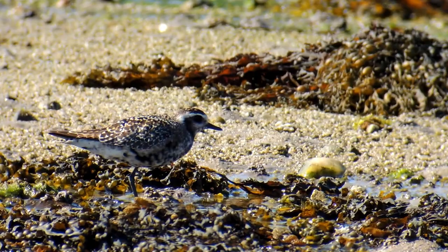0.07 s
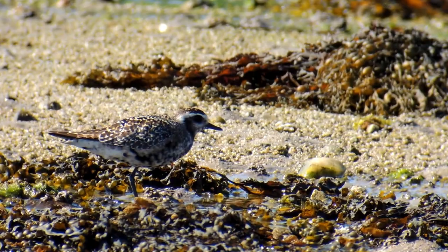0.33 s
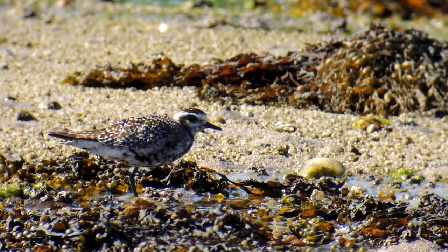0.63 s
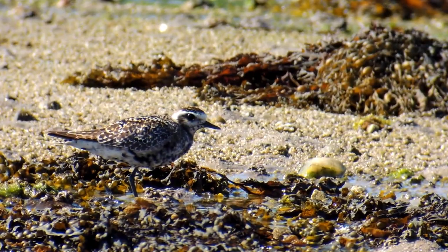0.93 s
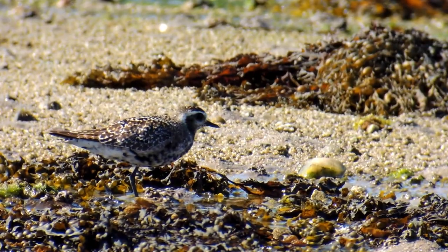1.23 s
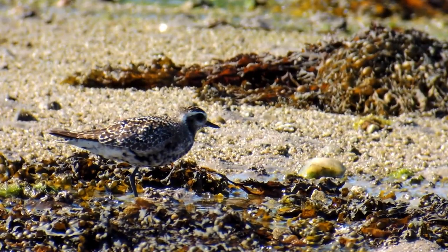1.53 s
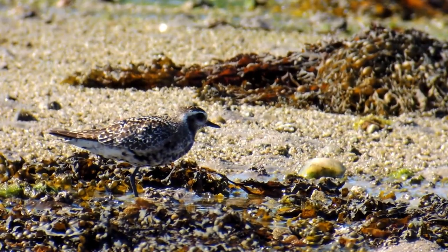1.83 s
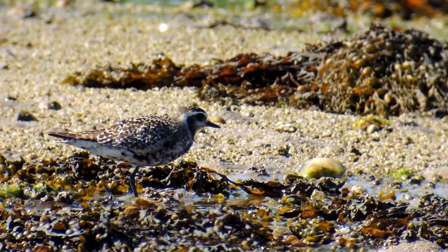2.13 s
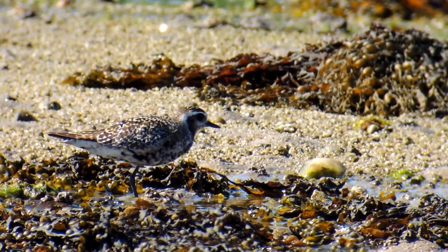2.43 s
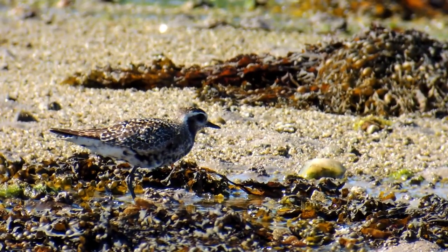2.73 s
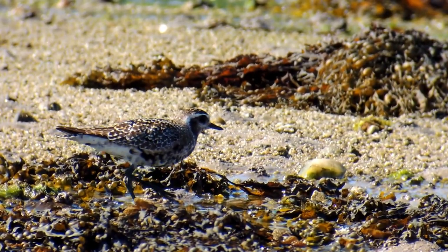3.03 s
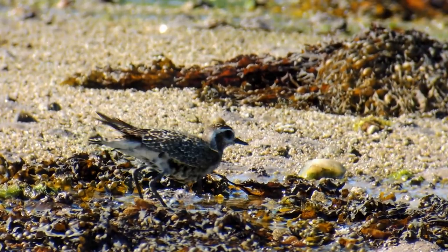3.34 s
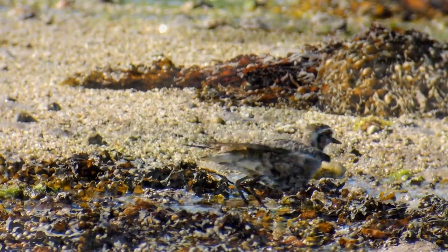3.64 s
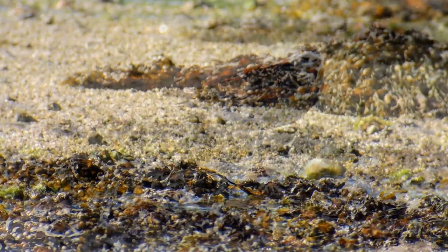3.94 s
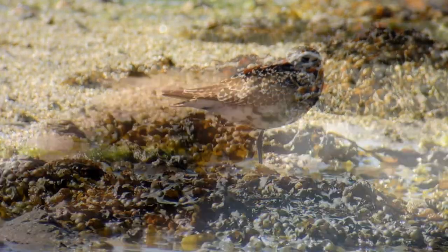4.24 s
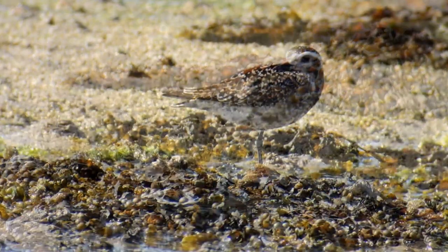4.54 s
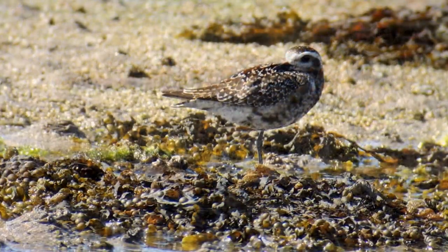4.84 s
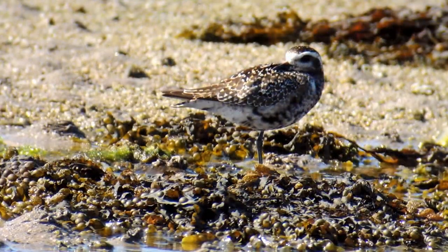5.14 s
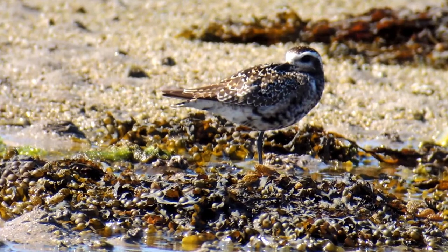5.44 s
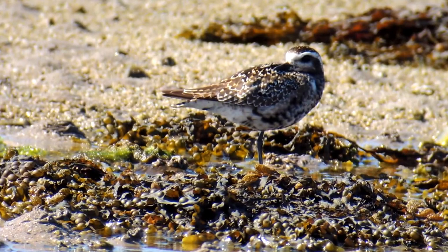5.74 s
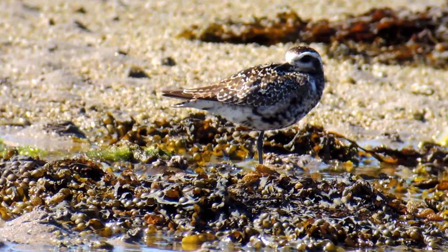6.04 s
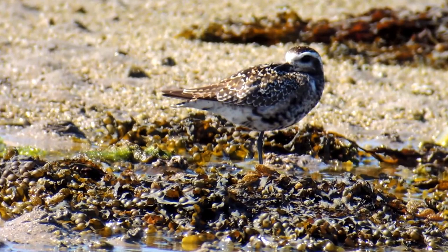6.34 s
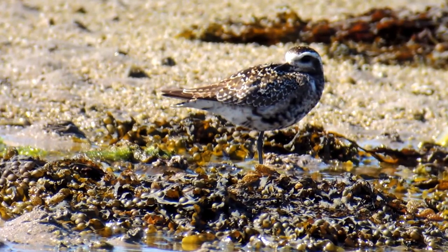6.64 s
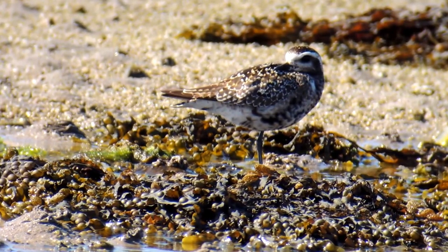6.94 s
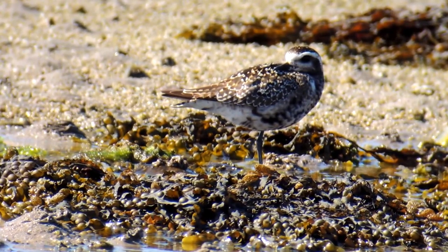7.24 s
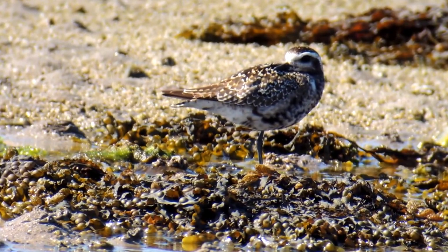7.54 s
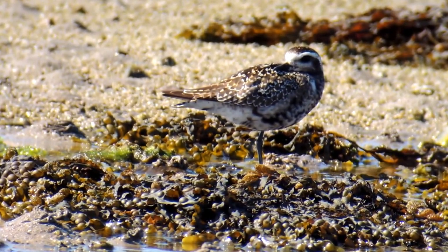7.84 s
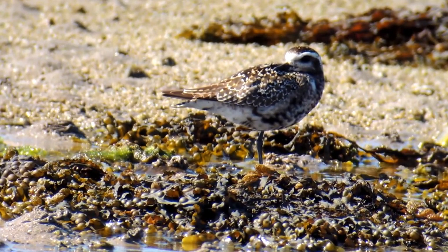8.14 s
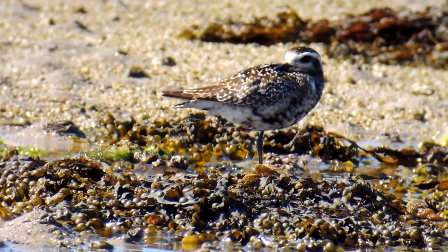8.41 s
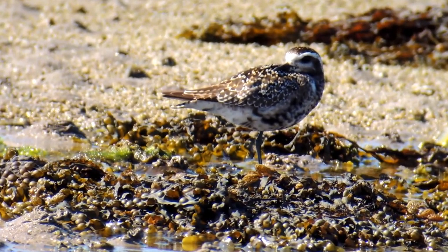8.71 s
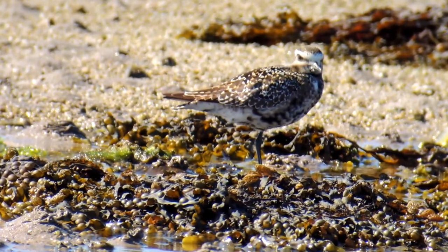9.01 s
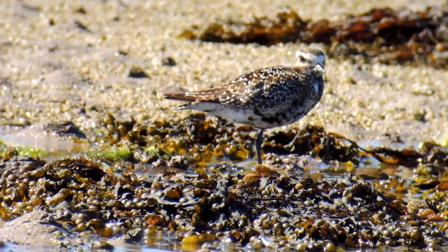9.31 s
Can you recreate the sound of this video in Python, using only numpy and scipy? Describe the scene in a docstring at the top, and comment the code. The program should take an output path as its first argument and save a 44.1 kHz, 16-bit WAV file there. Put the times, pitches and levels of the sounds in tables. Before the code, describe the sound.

Gusty wind rumbles and thumps on a microphone at the shore, over faint surf and hiss, with a little handling rustle and ticking.

```python
"""Gusts on a breezy shore.

Wind buffets the two ports of a hand-held microphone: turbulence rumbles, single eddies thump, and the
hardest gusts overload. Far surf, a fine hiss and a faint drone lie behind, and a wader whistles once.
Close by, handling rubs out a scratchy rustle, with a few dull pops and small bright ticks."""
import sys
import numpy as np
from scipy import signal
from scipy.io import wavfile
from scipy.ndimage import uniform_filter1d

SR = 44100
rng = np.random.default_rng(int(sys.argv[2]) if len(sys.argv) > 2 else 0)


def bounce(signal):
    """Save signal as a 16-bit WAV file at the path given by the first command-line argument."""
    frames = np.transpose(np.atleast_2d(signal))
    limited = np.clip(frames, -1, 1)
    pcm = np.round(limited * 32767).astype(np.int16)
    wavfile.write(sys.argv[1], SR, pcm)


N = 417627
TIME = np.arange(N) / SR


def from_db(db):
    """Decibels to gain."""
    return np.exp(np.asarray(db) * (np.log(10) / 20))


def unit_rms(x):
    """Scale to an rms of 1."""
    return x / np.sqrt(np.mean(x ** 2) + 1e-20)


def automation(rows):
    """Turn (time, values...) breakpoints into one curve per value."""
    times, *columns = np.transpose(rows)
    return [np.interp(TIME, times, column) for column in columns]


def at_hz(points, hz):
    """Read a curve on a log-frequency axis."""
    frequencies, values = np.transpose(points)
    return np.interp(np.log(hz), np.log(frequencies), values)


def drift(rate_hz):
    """Smooth random modulation with an rms of about 1."""
    hop, settle = 40, 2000
    pole = np.exp(-2 * np.pi * rate_hz * hop / SR)
    noise = rng.standard_normal(N // hop + settle + 2)
    slow = signal.lfilter([1], [1, -2 * pole, pole * pole], noise)[settle:]
    return np.interp(np.arange(N) / hop, np.arange(len(slow)), unit_rms(slow))


def power_envelope(start, hold, attack_s, release_s):
    """Rise to full power at start, hold, release; each slope covers 20 dB in its time."""
    out = np.zeros(N)
    near = slice(max(int((start - .3) * SR), 0), int((start + hold + .6) * SR))
    early = np.maximum(start - TIME[near], 0)
    late = np.maximum(TIME[near] - start - hold, 0)
    out[near] = from_db(-20 * (early / attack_s + late / release_s)) ** 2
    return out


def resonance(x, hz, width_hz):
    """One resonant band, unity gain at its peak."""
    return signal.lfilter(*signal.iirpeak(hz, hz / width_hz, fs=SR), x)


def noise_bands(count, passes=1):
    """Half-octave bands from 15 Hz up: yields (centre in Hz, pair of unrelated noises)."""
    edges = 15 * 2 ** (np.arange(count + 1) / 2)
    white = rng.standard_normal((2, 2, N))
    for k, (low, high) in enumerate(zip(edges, edges[1:])):
        sos = signal.butter(2, [low, high], "band", fs=SR, output="sos")
        yield np.sqrt(low * high), signal.sosfilt(np.tile(sos, (passes, 1)), white[k % 2])


def stereo(pair, correlation):
    """Mix two unrelated noises as mid and side into left and right."""
    mid = np.sqrt(1 + correlation) * pair[0]
    side = np.sqrt(1 - correlation) * pair[1]
    return np.array([mid + side, mid - side])


def wash(spectrum, correlation, flicker_db, flicker_hz):
    """A stereo noise bed whose bands each flicker on their own; rms 1."""
    bed = np.zeros((2, N))
    for hz, band in noise_bands(count=20):
        level_db = at_hz(spectrum, hz) + flicker_db * drift(flicker_hz)
        bed += stereo(band, at_hz(correlation, hz)) * from_db(level_db)
    return unit_rms(bed)


# The drone's partials: (centre [Hz], filter width [Hz], relative level [dB])
DRONE_PARTIALS = [(406, 45, 2), (809, 68, 6), (2120, 90, -1.5)]
# Its swell and fade: (time [s], level [dB])
DRONE_FADER = [(0, -80), (.8, -69), (1.9, -67.5), (2.7, -72), (3.4, -72), (4.0, -110)]


def drone():
    """A faint, wavering hum far along the shore: noise rung through narrow resonances."""
    level_db, = automation(DRONE_FADER)
    hum = np.zeros(N)
    for hz, width_hz, db in DRONE_PARTIALS:
        band = resonance(rng.standard_normal(N), hz, width_hz)
        hum += from_db(db) * unit_rms(resonance(band, hz, width_hz))
    return from_db(level_db) * hum


# The bed, dipping for a while after the hardest gust: (time [s], surf level [dB], hiss level [dB])
SHORE_FADERS = [(0, -49.5, -53.5), (2.3, -48.5, -53.5), (3.0, -49, -52), (3.3, -57, -59.5),
                (3.75, -69.5, -67), (4.15, -62.5, -65.5), (4.5, -57, -61.5), (5.0, -51, -55.5),
                (5.5, -48.5, -54), (6.8, -49, -54.5), (8.35, -48.5, -54), (8.55, -51.5, -56.5),
                (9.47, -49, -54.5)]
# Tone of the dark surf and of the bright hiss: (frequency [Hz], relative density [dB])
SURF_EQ = [(25, 11), (60, 8.5), (130, 3.5), (300, 1), (600, -0.5), (1000, -2), (1600, -8), (3000, -19),
           (6000, -21), (14000, -40.5)]
HISS_EQ = [(200, -9), (1000, -9), (2500, 0), (5000, -4.5), (8000, -5), (14000, -6.5)]
# Stereo image of the surf: (frequency [Hz], left-right correlation [0-1])
SURF_IMAGE = [(60, 0.87), (300, 0.47), (700, 0.58), (1500, 0.51), (4000, 0.44)]


def shore():
    """Far surf reaches both ports much alike; the fine hiss is different in each."""
    surf_db, hiss_db = automation(SHORE_FADERS)
    surf = wash(SURF_EQ, SURF_IMAGE, flicker_db=0.47, flicker_hz=6.3)
    hiss = wash(HISS_EQ, correlation=[(1000, .03)], flicker_db=1.5, flicker_hz=17)
    return from_db(surf_db) * surf + from_db(hiss_db) * hiss


# Pitch line of the bird's call: (time [s], pitch [Hz])
WADER_PITCH = [(4.013, 2620), (4.025, 2770), (4.064, 2700), (4.078, 2600), (4.125, 2590), (4.149, 2570),
               (4.171, 3050), (4.188, 2810), (4.22, 2570)]


def wader(level_db, fade_s, waver_db, waver_hz):
    """A far, nearly pure whistle that sags, flicks up and falls."""
    hz = automation(WADER_PITCH)[0] + waver_hz * drift(40)
    start, end = WADER_PITCH[0][0], WADER_PITCH[-1][0]
    gate = np.clip(np.minimum(TIME - start, end - TIME) / fade_s, 0, 1)
    tone = np.sqrt(2) * np.sin(2 * np.pi * np.cumsum(hz) / SR)
    return gate * from_db(level_db + waver_db * drift(41)) * tone


# Strokes of handling: (start [s], hold [s], level [dB])
RUSTLE_STROKES = [(2.322, 0.017, -57), (2.48, 0.092, -56.5), (2.595, 0.047, -49), (2.79, 0.035, -51),
                  (2.862, 0.019, -43.5), (2.93, .18, -53.5), (3.137, 0.015, -49), (3.29, 0.017, -54),
                  (3.343, 0.014, -50.5), (3.397, 0.029, -46.5), (3.578, 0.071, -60.5),
                  (3.671, 0.012, -53.5)]
# Tone of the rubbing: (frequency [Hz], relative density [dB])
RUSTLE_EQ = [(400, -19.5), (1200, -9.5), (2000, -0.5), (3000, -1.5), (4000, -1), (5000, -4.5), (6000, -8.5),
             (9000, -4.5), (11000, -14.5), (14000, -21)]
# Resonances the rubbing excites: (centre [Hz], width [Hz], relative level [dB])
RUSTLE_RESONANCES = [(2000, 480, 2), (2420, 120, -0.5), (3960, 270, 7.5), (6080, 740, 6),
                     (9000, 1800, -4.5)]


def rustle(grain_db, body_db):
    """Close rubbing: a scratchy hiss that catches and slips, with resonances that come and go."""
    power = sum(from_db(db) ** 2 * power_envelope(start, hold, attack_s=0.01, release_s=0.071)
                for start, hold, db in RUSTLE_STROKES)
    correlation = [(2500, 1.0), (7000, 0.79), (14000, 0.28)]   # the image widens toward the top
    rubbing = wash(RUSTLE_EQ, correlation, flicker_db=0.5, flicker_hz=33)
    rubbing *= from_db(grain_db * drift(100))
    body = sum(from_db(db + body_db + 2.0 * drift(8)) * resonance(rubbing, hz, width_hz)
               for hz, width_hz, db in RUSTLE_RESONANCES)
    return np.sqrt(power) * unit_rms(rubbing + body)


# Small, bright ticks:
# (time [s], crack peak [dB], crack centre [Hz], crack width [Hz], ring peak [dB], ring centre [Hz])
TICK_CUES = [(4.071, -45, 8600, 6000, -62, 5000), (4.166, -41, 7140, 7000, -52, 2980),
             (5.1495, -22, 5080, 1500, -29, 3720), (5.646, -34, 13000, 2500, -38, 5200),
             (7.885, -38, 7000, 5000, -53, 5000), (7.948, -34, 10200, 3000, -39, 5130),
             (8.134, -23.5, 10800, 4500, -32.5, 6360)]


def ticks(correlation, snap, t60_s, ring_width_hz):
    """A snap and a tiny noise burst, heard as a broad bright crack and a narrower ring below it."""
    out, size = np.zeros((2, N)), 2048
    decay = from_db(-60 * TIME[:size] / t60_s)
    for time, crack_db, crack_hz, crack_width_hz, ring_db, ring_hz in TICK_CUES:
        onset = int(time * SR)
        burst = stereo(rng.standard_normal((2, size)), correlation) * decay
        burst[:, 0] += snap
        for db, hz, width in (crack_db, crack_hz, crack_width_hz), (ring_db, ring_hz, ring_width_hz):
            edges = [hz - width / 2, hz + width / 2]
            tick = signal.sosfilt(signal.butter(2, edges, "band", fs=SR, output="sos"), burst)
            out[:, onset:onset + size] += from_db(db) * tick / np.abs(tick).max()
    return out


# Dull pops of handling and wind: (time [s], peak [dB], corner [Hz])
POP_CUES = [(3.313, -17, 90), (3.339, -25, 200), (3.4591, -21.5, 250), (3.487, -32, 250),
            (3.609, -30.5, 300), (3.662, -38, 300), (3.885, -40.5, 300), (5.76, -28.5, 350),
            (8.4464, -25, 250), (9.014, -25.5, 250)]


def pops():
    """Each pop is a sudden step of pressure that leaks away."""
    out, size = np.zeros(N), 2048
    for time, peak_db, corner_hz in POP_CUES:
        onset = int(time * SR)
        out[onset:onset + size] += from_db(peak_db) * np.exp(-2 * np.pi * corner_hz * TIME[:size])
    return out


# The light breeze between gusts: (time [s], level [dB])
BREEZE_FADER = [(0, -40.5), (1.8, -49.5), (2.4, -34.5), (3.7, -36), (4.4, -57.5), (4.9, -54), (5.3, -53.5),
                (7.9, -77), (8.2, -43.5), (9.47, -60)]
# Gusts at the ports: (start [s], hold [s], left level [dB], right level [dB], base corner [Hz])
GUST_CUES = [(0.218, .14, -30, -27, 97), (0.382, 0.12, -27, -29, 96), (0.56, 0.068, -26.5, -34, 100),
             (0.646, 0.16, -30, -33.5, 110), (1.382, 0.095, -34.5, -41, 100), (1.544, 0.14, -36, -37.5, 98),
             (1.942, .09, -36, -35.5, 92), (2.035, 0.045, -19, -13.5, 117),
             (2.122, 0.13, -21.5, -21.5, 130), (2.278, 0.058, -21, -17.5, 161),
             (2.45, 0.092, -42, -31.5, 116), (2.632, 0.064, -27, -26, 124), (2.754, 0.09, -18, -14, 103),
             (3.04, 0.048, -5, -4, 114), (3.143, 0.094, -14.5, -14.5, 101), (3.26, .11, -23.5, -23, 114),
             (3.437, 0.056, -12.5, -11.5, 118), (3.515, .11, -18, -19.5, 146),
             (3.637, 0.045, -15, -19, 185), (3.704, 0.081, -27.5, -31, 172),
             (3.879, 0.097, -34.5, -27.5, 139), (4.013, 0.043, -33.5, -39.5, 133),
             (4.164, .025, -41.5, -49.5, 132), (4.578, 0.054, -34.5, -36, 183),
             (4.697, 0.057, -33, -31, 214), (6.315, .1, -43, -43, 99), (8.257, 0.15, -37, -48, 133),
             (8.445, 0.049, -15, -24.5, 143), (8.585, 0.064, -26.5, -21, 168),
             (8.701, 0.037, -21.5, -24.5, 126), (8.77, 0.2, -33, -39, 135), (8.947, 0.094, -24, -17.5, 140),
             (9.268, 0.14, -17.5, -17, 98)]


def airflow(breeze_corner_hz):
    """Gusts add up over the breeze: the level at each port in dB, and the power-weighted corner in Hz."""
    breeze = from_db(automation(BREEZE_FADER)[0]) ** 2
    power = np.array([breeze, breeze])
    weighted_corner = 2 * breeze * breeze_corner_hz
    for start, hold, left_db, right_db, hz in GUST_CUES:
        envelope = power_envelope(start, hold, attack_s=0.023, release_s=0.042)
        gust = from_db([[left_db], [right_db]]) ** 2 * envelope
        power += gust
        weighted_corner += hz * gust.sum(axis=0)
    return 10 * np.log10(power), weighted_corner / power.sum(axis=0)


def buffeting(ports_db, corner_hz, rolloff_db, steepness, tilt_db_per_octave, lumpy_db, spurt_octaves):
    """Turbulence at each port: a lumpy rumble that follows the gusts."""
    # small eddies come in brief spurts, and die out steeply above the corner
    corner_hz = corner_hz * 2 ** (spurt_octaves * np.array([drift(63), drift(50)]))
    flow = np.zeros((2, N))
    for hz, band in noise_bands(count=14, passes=2):
        band_db = tilt_db_per_octave * np.log2(hz) - rolloff_db * (hz / corner_hz) ** steepness
        flow += stereo(band, correlation=0.12) * from_db(band_db)
    # even out the noise, so that the gust and its lumps set the strength
    window = int(0.028 * SR)
    power = uniform_filter1d(uniform_filter1d(flow ** 2, window), window)
    levelled = flow / np.sqrt(np.abs(power) + 1e-20)
    lumps_db = lumpy_db * np.array([drift(22), drift(15.7)])
    return levelled * from_db(ports_db + lumps_db)


def sputter(ports_db, corner_hz, per_second, offset_db, spread_db, octaves_up, spread_octaves):
    """Small eddies arrive by chance, scaled to the wind's strength and speed: cues for eddies()."""
    hop = 256
    moments = np.arange(0, N, hop)
    born = rng.random(len(moments)) < per_second * hop / SR
    scatter = rng.standard_normal((len(moments), 3))
    cues = []
    for i, luck in zip(moments[born], scatter[born]):
        left_db, right_db = ports_db[:, i] + offset_db + spread_db * luck[:2]
        hz = corner_hz[:, i].mean() * 2 ** (octaves_up + spread_octaves * luck[2])
        cues.append((i / SR, left_db, right_db, hz))
    return cues


# Eddies that stand out as thumps, before trim: (time [s], left level [dB], right level [dB], swing [Hz])
THUMP_CUES = [(0.575, -21.5, -39, 120), (0.752, -18.5, -37, 171), (1.017, -18, -47, 150),
              (1.655, -25, -42, 85), (2.042, -35, -4.5, 147), (2.064, -20, -5, 159), (2.228, -18, -10, 263),
              (2.283, -36, -14.5, 520), (2.298, -18, -6.5, 177), (2.824, -7, -5.5, 169),
              (3.024, -0.5, -25, 196), (3.037, 11, -3, 240), (3.053, 8.5, 3, 570), (3.058, 9.5, -13, 750),
              (3.083, 8, 9, 386), (3.172, -14, -17, 400), (3.225, -8.5, -27, 292), (3.43, 2.5, -2, 289),
              (3.458, 1, -11, 250), (3.514, -6.5, -14, 249), (3.539, -17, -27, 575), (3.576, -17, -8, 188),
              (3.634, -3.5, -27, 410), (3.661, -4.5, -17.5, 319), (5.76, -42, -31.5, 305),
              (8.444, 7.5, -28, 204), (8.604, -24, -20.5, 278), (8.944, -7.5, -19, 107),
              (9.013, -8.5, -8, 171), (9.362, -30, -10.5, 310)]


def eddies(sputter_cues, rise_cycles, fall_cycles, trim_db):
    """An eddy crossing a port swings the pressure to and fro, quick to rise and a little slower to die."""
    out = np.zeros((2, N))
    for time, left_db, right_db, hz in THUMP_CUES + sputter_cues:
        near = slice(max(int((time - .05) * SR), 0), int((time + .05) * SR))
        cycles = (TIME[near] - time) * hz
        envelope = np.exp(-(cycles / np.where(cycles < 0, rise_cycles, fall_cycles)) ** 2)
        swing = np.sin(2 * np.pi * (cycles + rng.random((2, 1))))   # its own phase at each port
        out[:, near] += from_db([[left_db + trim_db], [right_db + trim_db]]) * envelope * swing
    return out


def wind(knee_db, db_per_octave, rumble_db):
    """Rumble, thumps and sputter; a harder gust is louder and breaks into smaller, faster eddies."""
    ports_db, base_corner_hz = airflow(breeze_corner_hz=107)
    excess_octaves = (ports_db - knee_db) / db_per_octave
    corner_hz = base_corner_hz * 2 ** (np.logaddexp(0, 2 * excess_octaves) / 2)   # opens on a soft knee
    rumble = buffeting(ports_db + rumble_db, corner_hz, rolloff_db=11.5, steepness=1.76,
                       tilt_db_per_octave=-0.61, lumpy_db=4.5, spurt_octaves=0.3)
    sputter_cues = sputter(ports_db, corner_hz, per_second=18, offset_db=-5.5, spread_db=1,
                           octaves_up=0.72, spread_octaves=0.37)
    return rumble + eddies(sputter_cues, rise_cycles=0.4, fall_cycles=0.65, trim_db=1.5)


def scene():
    """The mix: quiet shore at the back, handling up close, wind on top."""
    far = shore() + drone() + wader(level_db=-59.5, fade_s=0.0084, waver_db=2.0, waver_hz=19)
    rubbing = rustle(grain_db=3.0, body_db=-2.5)
    clicks = ticks(correlation=0.74, snap=2.7, t60_s=0.0092, ring_width_hz=760) + pops()
    return far + rubbing + clicks + wind(knee_db=-26, db_per_octave=10.0, rumble_db=-1.62)


def record(dry):
    """The hardest gusts flatten against the overload ceiling; a steep low-pass cuts the top."""
    ceiling, hardness, cutoff_hz = 0.9, 30, 14400
    flattened = dry / (1 + np.abs(dry / ceiling) ** hardness) ** (1 / hardness)
    return signal.sosfilt(signal.ellip(10, .1, 70, cutoff_hz, fs=SR, output="sos"), flattened)


dry = scene()
out = record(dry)
bounce(out)
```